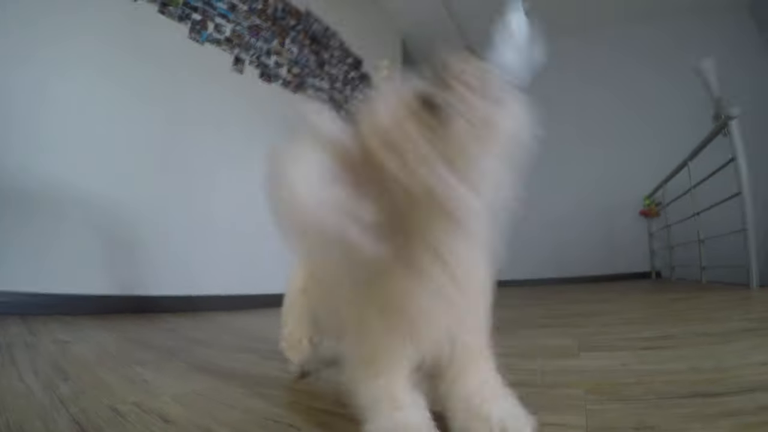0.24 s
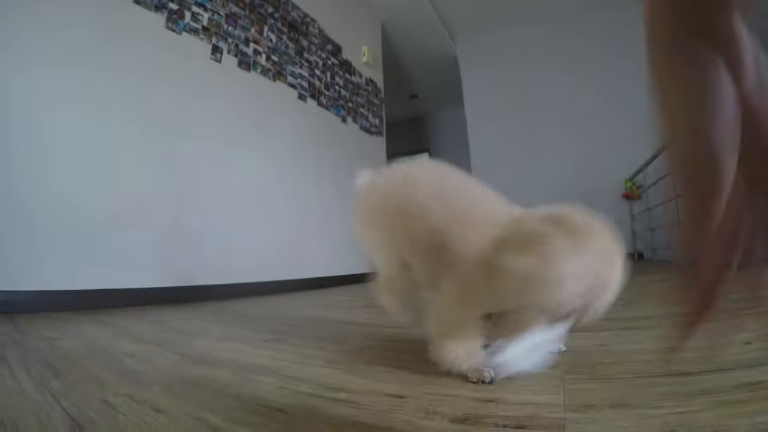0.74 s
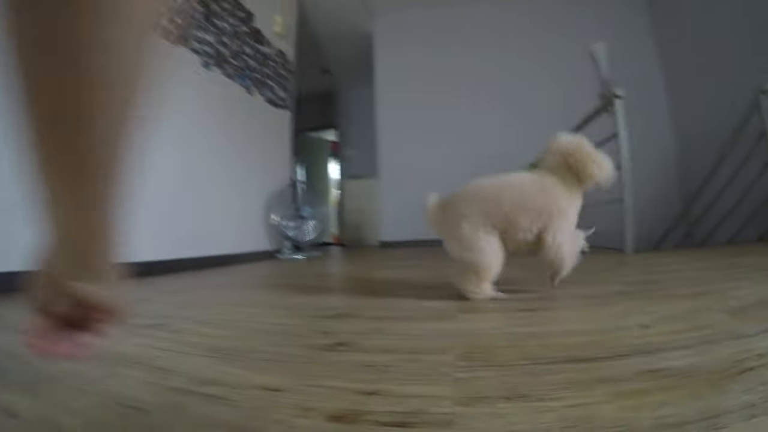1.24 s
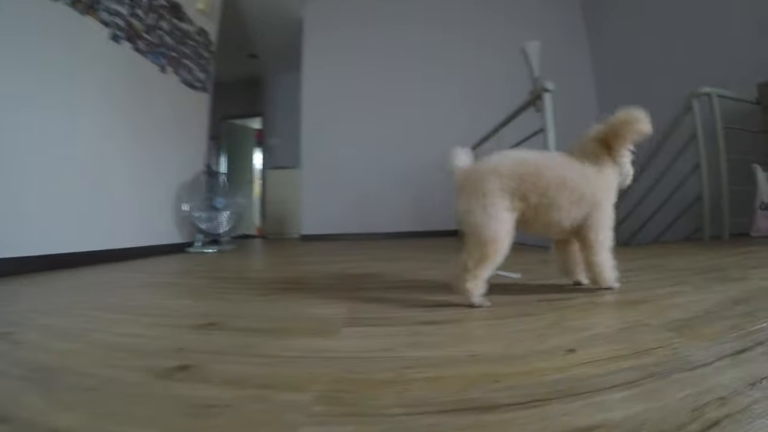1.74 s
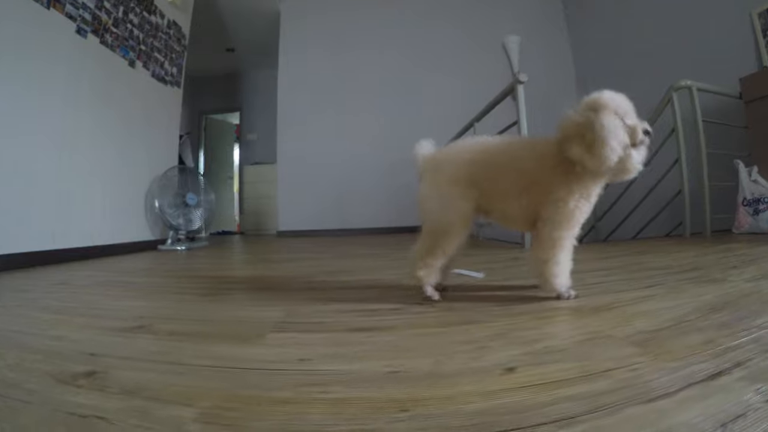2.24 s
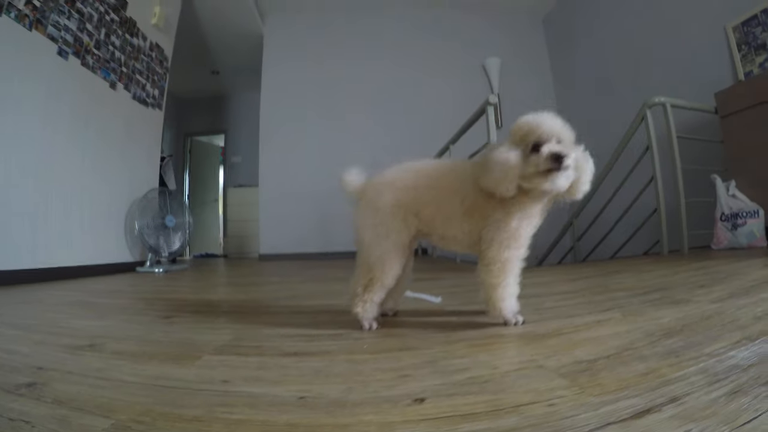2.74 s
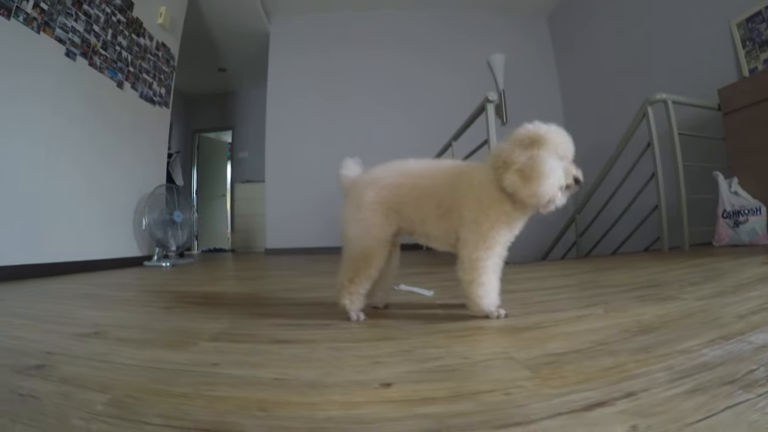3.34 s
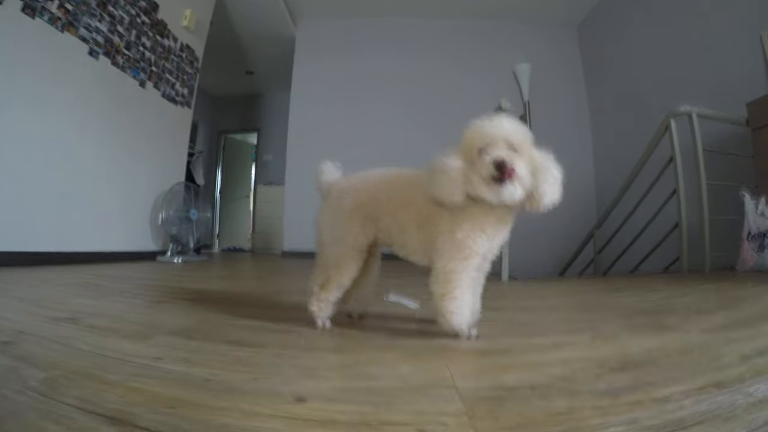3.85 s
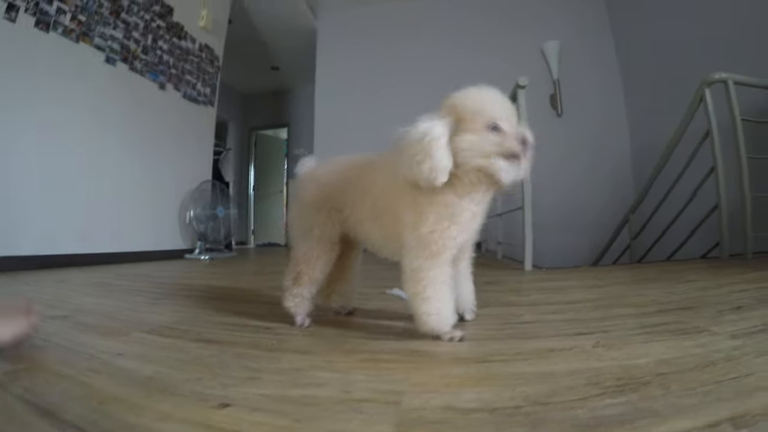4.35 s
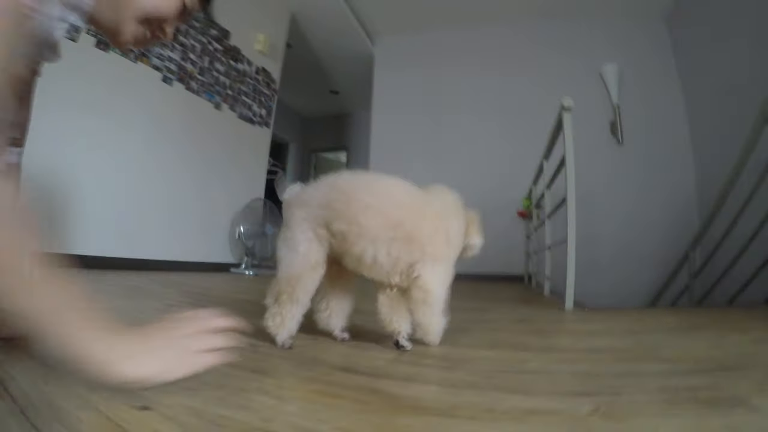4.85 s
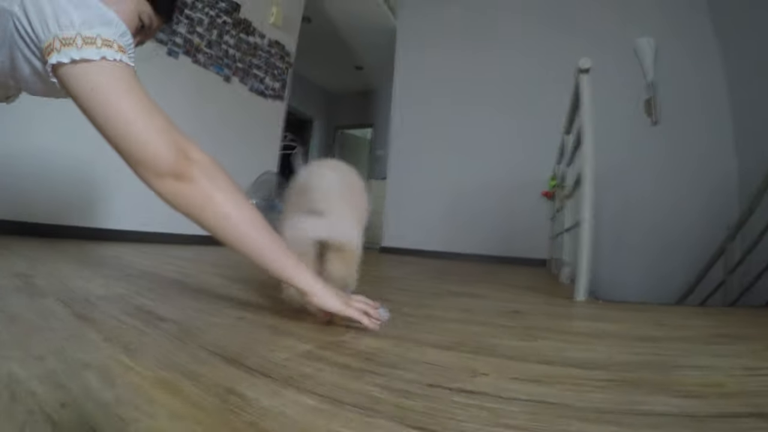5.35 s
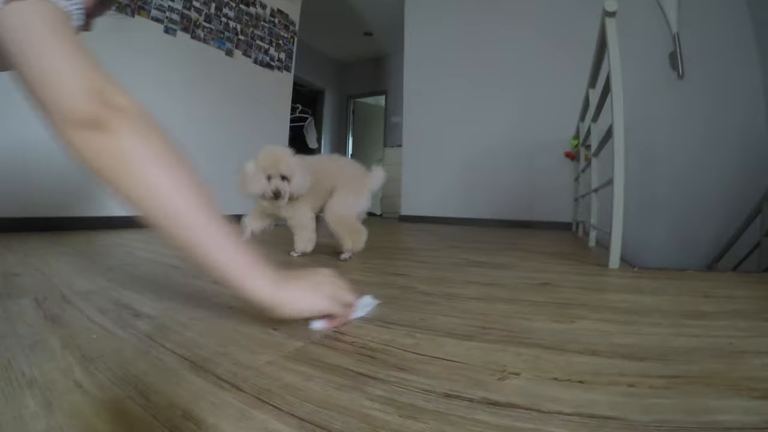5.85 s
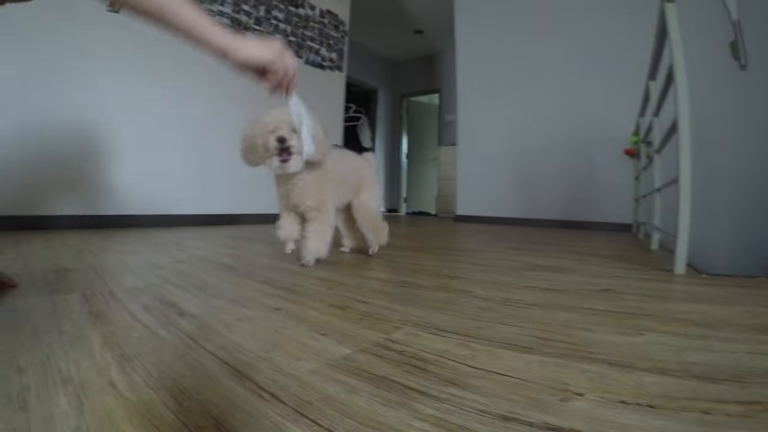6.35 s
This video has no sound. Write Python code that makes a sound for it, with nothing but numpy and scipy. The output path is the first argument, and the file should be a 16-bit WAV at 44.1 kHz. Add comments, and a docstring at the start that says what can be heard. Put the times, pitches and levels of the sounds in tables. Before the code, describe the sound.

A small dog plays in a quiet room, heard very close and dry. Faint quick huffs and soft thumps come first, with a few dull taps and light scuffs. Then long, rough growls swell and overlap, throbbing low in the throat, sometimes tightening into a hum or breaking into a rattle. Low air rumble buffets the microphone, and a bright tick lands midway.

```python
"""Long rough growls of a small dog playing indoors, very close and dry: a few huffs, then overlapping swells.
Each push of air sets a cavity throbbing near 175 Hz, mostly ragged, at times locking into a hum.
The same air rasps through resonances that move with the mouth, breaks into rattling pulses
and buffets the microphone. Single pushes ring the cavity as soft thumps, and a thin whistle of filtered
noise joins the huffs. Dull taps (short pulses) and bright ticks (noise bursts) come with the play."""
import sys
import numpy as np
from scipy.fft import rfft, irfft, next_fast_len
from scipy.io import wavfile
from scipy.ndimage import uniform_filter1d, minimum_filter1d

SR = 44100
rng = np.random.default_rng(int(sys.argv[2]) if len(sys.argv) > 2 else 0)


def master(y):
    """Save y as 16-bit WAV."""
    cut = np.clip(np.atleast_2d(y).T, -1, 1)
    pcm = np.round(cut * 32767)  # scale
    wavfile.write(sys.argv[1], SR, pcm.astype(np.int16))


N = 291573  # length in samples
TOP_HZ = 15200  # band limit

# spectrum of the quiet room: pitch_hz, density_db (dB per Hz)
FLOOR_SPECTRUM = [(30, -13), (170, 3), (1000, -30.5), (6600, -42.5), (11000, -41.5), (15000, -61)]
FLOOR_DB = -45.5

# small bright ticks and scuffs: start_s, level_db (before a common gain), centre_hz, t60_s
TICKS = [(.73, -45, 7150, 0.074), (0.827, -35, 1680, 0.26), (0.847, -42.5, 4200, 0.08),
         (0.932, -26, 3600, 0.17), (2.814, -27.5, 6870, 0.29), (2.821, -14.5, 2610, 0.15),
         (6.193, -34.5, 4020, 0.025)]
# dull taps: start_s, peak_db
TAPS = [(0.6, -30.5), (0.616, -27.5), (0.637, -24.5), (0.665, -25.5)]
# thin band of hiss in the first huffs: crest_s, hold_s, level_db, centre_hz, width_hz
WHISTLE = (.125, 0.16, -57, 4567, 450)
# single pushes of air into the cavity: start_s, ring_db, rasp_db (each before its own gain)
THUMPS = [(0.221, -6.5, -41.5), (0.335, -13.5, -46), (0.469, -1.5, -40.5), (0.508, -9.5, -51),
          (0.93, -20, -36.5), (1.16, -9.5, -40), (1.289, -0.5, -33.5), (1.32, -4, -29.5), (1.951, 2.5, -33),
          (2.195, -40, -29), (3.369, 0.5, -38), (3.777, -9.5, -35), (4.731, 0, -29.5), (4.801, -11.5, -29),
          (5.357, 3, -28), (6.021, -4.5, -44.5), (6.046, 1, -44)]

# air on the microphone: time_s, level_db (before BUFFET_GAIN_DB)
BUFFET_LEVEL = [(0, -53), (.8, -46), (1.15, -24.5), (1.75, -10), (2.03, -20), (2.55, -23), (2.8, -41.5),
                (3.15, -35.5), (3.8, -27), (4.4, -24), (4.5, -15), (5.3, -16), (5.85, -31.5), (6.1, -22.5),
                (6.32, -29), (6.61, -16.5)]
BUFFET_GAIN_DB = -1
# spectrum of that buffeting: pitch_hz, density_db (dB per Hz)
RUMBLE_SPECTRUM = [(12, -7), (45, 2.5), (66, 8), (100, 3.5), (135, -5), (400, -41.5)]

# first resonance of the rasp, mouth open, then nearly shut: pitch_hz, density_db (dB per Hz)
RASP_OPEN = [(250, -17), (560, -14.5), (730, -3), (1040, 0.5), (1270, -5), (1500, -9.5), (1800, -32.5)]
RASP_SHUT = [(250, -12.5), (500, -18), (700, -8), (860, -3.5), (1120, -13.5), (1450, -21), (1800, -39)]
# second resonance, the bite, mouth open, then nearly shut: pitch_hz, density_db (dB per Hz)
BITE_OPEN = [(1200, -30), (1500, -15), (1830, 1), (2200, -10.5), (2380, -8.5), (2900, -41)]
BITE_SHUT = [(1350, -30.5), (1600, -7), (1815, -1.5), (2050, -11.5), (2270, -18.5), (2430, -13),
             (2900, -43)]
# third resonance, the edge: pitch_hz, density_db (dB per Hz)
EDGE_SPECTRUM = [(2100, -27.5), (2650, -2.5), (3250, 3), (3700, -3.5), (4400, -20.5)]
# hiss above the resonances: pitch_hz, density_db (dB per Hz)
HISS_SPECTRUM = [(3600, -24.5), (4200, -4), (4800, -1), (5500, -7.5), (6600, -4), (7600, -11), (10800, -24),
                 (15000, -62.5)]
# low body of a dull rasp: pitch_hz, density_db (dB per Hz)
GRUFF_SPECTRUM = [(150, -15.5), (260, 4.5), (360, 6), (480, -0.5), (700, -2.5), (1450, -34), (2200, -35)]
GRUFF_DB = -11  # relative to the rasp, before it rises with dullness
# mean opening of the mouth: time_s, opening (0-1)
MOUTH = [(.5, 1), (1.7, 0.07), (3.9, 1), (5.15, 0.43), (5.4, 0.61), (6.5, 0.25)]

# pushes of the growl; bite, edge, hiss and throb are relative to the rasp:
# crest_s, hold_s, rise_s, fall_s, rasp_db, bite_db, edge_db, hiss_db, throb_db, pitch_hz
GROWLS = [(1.068, 0.072, 0.28, 0.2, -45.5, -5.5, -14, -16, 2.5, 190),
          (1.602, 0.2212, 0.45, 0.2553, -21.5, -1.5, -11, -16.5, 11, 196.6),
          (2.374, 0.17, 0.55, 0.16, -28, -1, -7.5, -16, 0, 186.7),
          (2.755, 0.14, 0.49, 0.082, -31.5, -1.5, -8, -17.5, 6.5, 178.3),
          (3.331, 0.35, 0.1977, 0.38, -26, -0.5, -9, -19.5, 6.5, 175),
          (3.861, 0.18, 0.35, 0.4, -19, 0, -10, -16, 6, 181.5),
          (4.411, 0.21, 0.13, 0.698, -22, 0, -10.5, -16, 8, 184.4),
          (5.032, 0.17, 0.22, 0.32, -21.5, 2, -5, -9, 7.5, 159.9),
          (5.281, 0.12, 0.21, 0.605, -22.5, -2.5, -36, -24.5, 9.5, 189.4),
          (5.728, 0.23, .18, 0.056, -32.5, -1, -20, -26, 7, 206.7),
          (5.901, 0.17, 0.11, 0.29, -32.5, -2.5, -13, -19, 10, 209.4),
          (6.471, 0.17, 0.17, 0.11, -32.5, -3, -12.5, -20, 9.5, 209.2)]
# short huffs; bite and hiss are relative to the rasp: crest_s, hold_s, rasp_db, bite_db, hiss_db
HUFFS = [(0.0, 0.035, -49, -2.5, -19), (0.079, 0.041, -42, -3, -26), (.125, 0.036, -40, 2, -17),
         (0.181, 0.071, -42.5, -3, -24), (0.315, 0.005, -42, -1.5, -16), (0.386, 0.035, -52, -1, -18),
         (0.425, 0.072, -47.5, 5, -15), (3.173, .1, -41, -16, -24)]
HUFF_RISE_S, HUFF_FALL_S = 0.018, 0.031
HUFF_EDGE_DB, HUFF_THROB_DB, HUFF_HZ = -11, 14.5, 181.4  # edge and throb relative to the rasp; pitch
SWELL_DB = 19.5  # gained in the rise time and lost in the fall time
SWELL_END = 1.68  # a push has run out this many rise or fall times from its hold
# air that flows on between growls: rasp_db, bite_db, edge_db, hiss_db, throb_db
IDLE_DB = (-57.5, -58.5, -61, -63, -45.5)
IDLE_FROM_S, IDLE_HZ, HUSH_DB = 0.86, 189.7, -14.5  # onset; pitch; level change before the onset

# moments when the throb swells at its own pitch, mostly locked into a hum, once low and ragged:
# middle_s, half_length_s, level_db, pitch_hz, roughness (0 locked, 1 or more ragged)
HUMS = [(0.027, 0.017, -21, 171.4, 0.4), (0.16, 0.012, -19, 182, 0.1), (2.499, 0.109, -9.5, 172.5, 0.07),
        (2.658, 0.043, -16.5, 183, 0), (2.776, 0.0878, -4.5, 172.2, 0), (3.644, 0.1, -12.5, 174.3, 0),
        (3.734, 0.026, -8.5, 179, 0), (3.873, 0.073, -8.5, 181.2, .05), (4.123, 0.096, -14, 183.7, 0.16),
        (4.613, 0.037, -3.5, 184.5, 0.02), (4.839, 0.1205, -13, 185.7, .4), (5.201, .14, -14.5, 127.6, 1.2),
        (5.533, 0.0372, -5.5, 204, 0.4)]
HUM_EDGE_DB = 5  # such a moment is this much down half a length from its middle
RAGGED = 0.87  # roughness of the unlocked throb, 0-1
# overtones of the throb: multiple, level_db (before strain scales it)
OVERTONES = [(2, -23)]

# runs of hard, uneven pulses: start_s, end_s, rate_per_s (typical), crack_peak_db (typical)
RATTLES = [(1.568, 1.69, 93, -11), (1.708, 1.745, 140, -8), (1.768, 1.888, 81, -11.5),
           (3.866, 4.081, 85, -11), (5.026, 5.211, 91, -11), (5.249, 5.33, 115, -10),
           (5.365, 5.554, 90, -16.5), (6.461, 6.585, 95, -20)]
RATTLE_RASP_DB, RATTLE_THROB_DB = -5, -3  # the steady rasp and throb give way to the pulses
# short gaps where the throb breaks off and the air rushes through: middle_s
BREAKS = [3.766, 3.806, 3.952, 3.983, 4.111, 5.235, 5.346]
BREAK_HALF_S, BREAK_THROB_DB, BREAK_RASP_DB = 0.0078, -12, 2.5  # half length; change in each


def amp(db):
    """Logarithmic level: decibels to amplitude ratio."""
    return 10 ** (np.asarray(db) / 20)


def unit(x):
    """Normalisation: scale to rms 1."""
    return x / np.sqrt(np.mean(abs(x) ** 2) + 1e-20)


def curves(rows):
    """Linear interpolation: one value per sample for each column after the time."""
    s, *cols = np.transpose(rows)
    return [np.interp(np.arange(N) / SR, s, c) for c in cols]


def filtered(x, response):
    """Linear filtering: the spectrum of x times a response of frequency."""
    m = next_fast_len(x.shape[-1] + 8192)
    spectrum = rfft(x, m) * response(np.fft.rfftfreq(m, 1 / SR))
    return irfft(spectrum, m)[..., :x.shape[-1]]


def coloured(x, points):
    """Minimum-phase filtering: x rings causally through a (Hz, dB) spectrum; rms 1."""
    f, db = np.transpose(points)
    m = 2 * next_fast_len(len(x))
    # interpolate over log frequency, falling to -90 dB an octave outside the points
    log_hz = np.log(np.fft.rfftfreq(m, 1 / SR) + 1)
    log_points = np.log(np.r_[f[0] / 2, f, f[-1] * 2])
    log_gain = np.log(amp(np.interp(log_hz, log_points, np.r_[-90, db, -90])))
    # folding the cepstrum onto positive time makes the filter causal
    cepstrum = irfft(log_gain)[:m // 2]
    cepstrum[1:] *= 2
    return unit(irfft(rfft(x, m) * np.exp(rfft(cepstrum, m)))[:len(x)])


def white():
    """White noise: equal mean power at every frequency."""
    return rng.standard_normal(N)


def flutter(corner_hz):
    """Low-passed noise: a random curve of rms 1, mostly slower than the corner."""
    return unit(filtered(white(), lambda hz: 1 / (1 + (hz / corner_hz) ** 4)))


def steadied(x, seconds):
    """Level control: slow swells are divided out, fast ones kept."""
    size = max(int(seconds * SR), 2)
    power = uniform_filter1d(uniform_filter1d(abs(x) ** 2, size), size)
    return x / np.sqrt(abs(power) + 1e-9)


def add(track, s, sound):
    """Superposition: mix a sound into the track at a time."""
    part = track[max(round(s * SR), 0):][:len(sound)]
    part += sound[:len(part)]


def gate(s, half):
    """Smooth windowing: 1 around a time, 0 elsewhere, with soft edges."""
    return np.exp(-np.minimum(abs(np.arange(N) / SR - s) / half, 3) ** 4)


def swell(crest, hold, rise, fall):
    """Envelope in dB of one push of air: it climbs, holds at 0, sinks and runs out."""
    t = np.arange(N) / SR
    away = np.maximum(crest - t, 0) / rise + np.maximum(t - crest - hold, 0) / fall
    return -SWELL_DB * (away + np.minimum(away / SWELL_END, 2) ** 10)


def room_floor():
    """Stationary coloured noise: the steady sound of the quiet room."""
    return amp(FLOOR_DB) * coloured(white(), FLOOR_SPECTRUM)


def ticks(gain_db=-24, sharpness=5, soft_hz=8000):
    """Band-limited decay: short noise bursts around one centre, soft at the top."""
    out, t = np.zeros(N), np.arange(SR // 5) / SR
    for s, db, centre, t60 in TICKS:
        def band(hz):
            detuning = hz / centre - centre / (hz + 1)
            return 1 / (1 + sharpness * detuning ** 2) / (1 + (hz / soft_hz) ** 10)
        burst = rng.standard_normal(len(t)) * amp(-60 * t / t60)
        add(out, s, amp(db + gain_db) * unit(filtered(burst, band)))
    return out


def taps(width_s=0.0011, gain_db=4):
    """Heavily damped impulse: a dull tap is one short push with no ring."""
    out, u = np.zeros(N), np.arange(SR // 50) / SR / width_s
    pulse = np.e * u * (1 - u / 2) * np.exp(-u)
    for s, db in TAPS:
        add(out, s, amp(db + gain_db) * pulse)  # the gain makes up for the pulse's peak below 1
    return out


def whistle():
    """Narrow-band noise: a thin hiss that swells and fades like a huff."""
    crest, hold, db, centre, width = WHISTLE
    thin = unit(filtered(white(), lambda hz: 1 / (1 + (2 * (hz - centre) / width) ** 4)))
    return amp(db + swell(crest, hold, HUFF_RISE_S, HUFF_FALL_S)) * thin


def thumps(ring_hz=195, t60=0.035, attack_s=0.0022, gain_db=1, spurt_db=-7, spurt_t60=0.022):
    """Damped resonance: each push rings the cavity for a few cycles and lets out a spurt of rasp."""
    out, t = np.zeros(N), np.arange(SR // 8) / SR
    ring = np.sin(2 * np.pi * ring_hz * t) * amp(-60 * t / t60) * (1 - np.exp(-t / attack_s))
    for s, db, rasp_db in THUMPS:
        air = rng.standard_normal(len(t)) * amp(-60 * t / spurt_t60)
        spurt = unit(coloured(air, RASP_OPEN) + coloured(air, BITE_OPEN) + coloured(air, EDGE_SPECTRUM) / 2)
        add(out, s, amp(db + gain_db) * ring + amp(rasp_db + spurt_db) * spurt)
    return out


def rattles(jitter=0.17, scatter_db=0.5, crack_t60=0.0045, bite_db=-1, edge_db=-19,
            ring_db=0, ring_hz=200, ring_t60=0.053):
    """Impulse excitation: each pulse cracks through the throat's resonances and briefly swings the cavity."""
    out, t = np.zeros(N), np.arange(SR // 25) / SR
    ring = amp(ring_db - 60 * t / ring_t60) * np.sin(2 * np.pi * ring_hz * t)
    for start, end, rate, db in RATTLES:
        draws = rng.standard_normal(size=(24, len(t) + 2))  # at most 24 pulses a run
        gaps = np.exp(jitter * draws[:, 0]) / rate
        times = start + np.cumsum(gaps) - gaps[0]
        for s, size, air in zip(times, draws[:, 1], draws[:, 2:]):
            if s < end:
                air = air * amp(-60 * t / crack_t60)
                crack = coloured(air, RASP_SHUT) + amp(bite_db) * coloured(air, BITE_SHUT)
                crack = crack + amp(edge_db) * coloured(air, EDGE_SPECTRUM)
                add(out, s, amp(db + scatter_db * size) * (crack / abs(crack).max() + ring))
    return out


def puffs(rate=70, spread_db=4.0, spacing=.45):
    """Eddy shedding: one impulse for each eddy, at uneven intervals and of its own size."""
    draws = rng.standard_normal((N // 200, 2))
    at = (np.cumsum(np.exp(spacing * draws[:, 0])) * SR / rate).astype(int)
    return np.bincount(at[at < N], amp(spread_db * draws[at < N, 1]), N)


def pushed(kicks, seconds):
    """Second-order smoothing: each kick becomes a push that rises and dies away; rms 1 about zero."""
    push = filtered(kicks, lambda hz: 1 / (1 + 2j * np.pi * hz * seconds) ** 2)
    return unit(push - push.mean())


def buffet(kicks):
    """Low-frequency turbulence: noise and eddies rumble on the microphone."""
    gusts = steadied(coloured(white() + 0.41 * unit(kicks), RUMBLE_SPECTRUM), 0.16)
    return amp(curves(BUFFET_LEVEL)[0] + BUFFET_GAIN_DB) * gusts


def effort():
    """Power addition of pushes and hums; pitch and roughness follow whichever throbs most.
    Gives the (rasp, bite, edge, hiss) levels in dB, the throb's level in dB, its pitch and its roughness."""
    t = np.arange(N) / SR
    power = lambda db: amp(np.maximum(db, -200)) ** 2
    huffs = [(s, hold, HUFF_RISE_S, HUFF_FALL_S, db, bite_db, HUFF_EDGE_DB, hiss_db, HUFF_THROB_DB, HUFF_HZ)
             for s, hold, db, bite_db, hiss_db in HUFFS]
    # rows of power: rasp, bite, edge, hiss, throb
    bands = np.outer(power(IDLE_DB), power(HUSH_DB * (t < IDLE_FROM_S)))
    pitch = IDLE_HZ * bands[-1]  # weighted by throb power until the division below
    for crest, hold, rise, fall, db, bite_db, edge_db, hiss_db, throb_db, hz in GROWLS + huffs:
        balance = power([0, bite_db, edge_db, hiss_db, throb_db])
        push = np.outer(balance, power(db + swell(crest, hold, rise, fall)))
        bands = bands + push
        pitch = pitch + hz * push[-1]
    total, ragged = bands[-1], RAGGED * bands[-1]
    for s, half, db, hz, rough in HUMS:
        hum = power(db - HUM_EDGE_DB * ((t - s) / half) ** 2)
        total, pitch, ragged = total + hum, pitch + hz * hum, ragged + rough * hum
    return 10 * np.log10(bands[:-1]), 10 * np.log10(total), pitch / total, np.clip(ragged / total, 0, 1)


def throb(kicks, throb_db, pitch, rough, width_hz=26, skirt_hz=120, stir=0.71, waver_hz=1.85):
    """Driven resonance: the cavity's swing near rms 1, a locked tone mixed with eddy-started ringing."""
    phase = 2 * np.pi * np.cumsum(pitch + waver_hz * flutter(37)) / SR
    # shifted down by the pitch, the resonance becomes a low-pass on a complex envelope
    ringing = lambda hz: 1 / (1 + 1j * hz / width_hz) / np.sqrt(1 + (hz / skirt_hz) ** 6)
    drive = unit(kicks * np.array([np.cos(phase), -np.sin(phase)])) + stir * np.array([white(), white()])
    eddies = filtered(drive, ringing)
    ragged = steadied(eddies[0] + 1j * eddies[1], 0.072)
    envelope = steadied(np.sqrt(1 - rough) + np.sqrt(rough) * ragged, 0.081)
    swing = envelope * np.exp(1j * phase)
    overtones = sum(amp(db) * np.cos(round(k) * phase) for k, db in OVERTONES)
    strain = (1 - rough) * amp(throb_db + 3.5)  # overtones grow only when the swing is wide and steady
    return np.sqrt(2) * (swing.real + strain * overtones)


def voiced(x, shut, wide, opening):
    """Moving formant: a crossfade between the resonances of the shut and the open mouth."""
    return (1 - opening) * coloured(x, shut) + opening * coloured(x, wide)


def rasp(swing, kicks, air_db, rough, cycle_db=-1.07, locked_db=7.5, puff_db=2.0, burst_db=1.0,
         lurch_db=1.5, dull_gain=5.2, grain=0.37, mouth_waver=0.34):
    """Modulated turbulence: noise spurts with each eddy when ragged, once a swing when locked."""
    rasp_db, bite_db, edge_db, hiss_db = air_db
    loose = rough ** .25
    eddy = np.minimum(pushed(kicks, .0014), 1.8)
    spurts_db = (cycle_db + locked_db * (1 - loose)) * swing + puff_db * loose * eddy
    spurts_db = spurts_db + burst_db * flutter(220) + lurch_db * flutter(27)

    def spurting(depth):
        """Amplitude modulation: fresh noise follows the spurts to a depth."""
        return white() * steadied(amp(depth * spurts_db + 1.1 * flutter(180)), 0.69)

    # each eddy also knocks the lower resonances, which ring briefly
    knocks = grain * loose * unit(np.sqrt(kicks))
    opening = np.clip(curves(MOUTH)[0] + mouth_waver * flutter(24), 0, 1)
    low = amp(rasp_db - 1.0) * voiced(spurting(0.81) + knocks, RASP_SHUT, RASP_OPEN, opening)
    middle = amp(bite_db - 2.0) * voiced(spurting(0.82) + knocks, BITE_SHUT, BITE_OPEN, opening)
    # the duller the rasp, the more gruff low-middle it carries
    dullness_db = np.minimum(rasp_db - bite_db, 5.5)
    gruff_db = rasp_db + GRUFF_DB + dull_gain * dullness_db
    gruff = amp(gruff_db) * coloured(spurting(0.91) + knocks, GRUFF_SPECTRUM)
    edge = amp(edge_db) * coloured(spurting(0.58), EDGE_SPECTRUM)
    high = amp(hiss_db - 2.5) * coloured(spurting(0.71), HISS_SPECTRUM)
    return gruff + low + middle + edge + high


def growl():
    """Common excitation: one stream of eddies feeds throb, rasp and buffeting; rattles and breaks interrupt."""
    air_db, throb_db, pitch, rough = effort()
    rattling = sum(gate((start + end) / 2, (end - start) / 2) for start, end, *_ in RATTLES)
    broken = sum(gate(s, BREAK_HALF_S) for s in BREAKS)
    kicks = puffs()
    swing = throb(kicks, throb_db, pitch, rough)
    low = amp(throb_db + RATTLE_THROB_DB * rattling + BREAK_THROB_DB * broken) * swing
    rasp_gain = amp(RATTLE_RASP_DB * rattling + BREAK_RASP_DB * broken)
    return low + buffet(kicks) + rasp_gain * rasp(swing, kicks, air_db, rough)


def scene():
    """Superposition: all sources add and reach both channels alike."""
    mono = room_floor() + ticks() + taps() + whistle() + thumps() + rattles() + growl()
    return np.array([mono, mono])


def record(dry, ceiling=0.96):
    """Peak limiting, then band limiting: loud peaks are held down and nothing is kept above TOP_HZ."""
    needed = np.minimum(1, ceiling / (abs(dry).max(axis=0) + 1e-9))
    gain = uniform_filter1d(minimum_filter1d(needed, size=400), size=400)
    return filtered(dry * gain, lambda hz: hz < TOP_HZ)


dry = scene()
out = record(dry)
master(out)
```